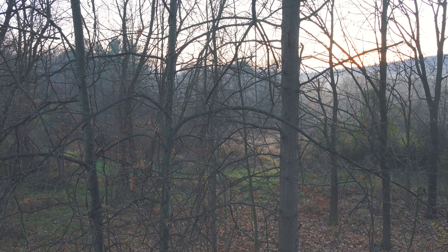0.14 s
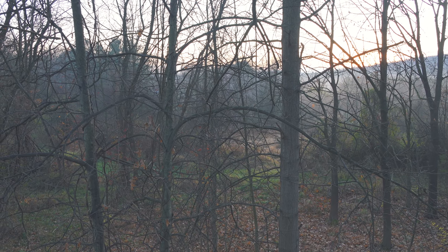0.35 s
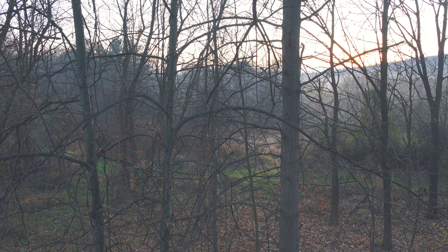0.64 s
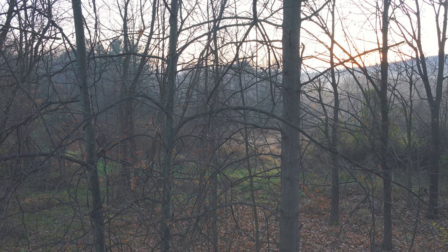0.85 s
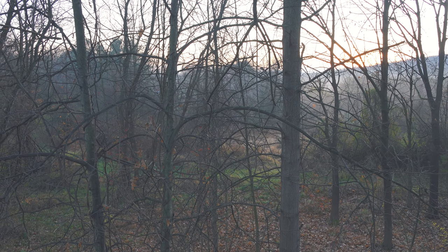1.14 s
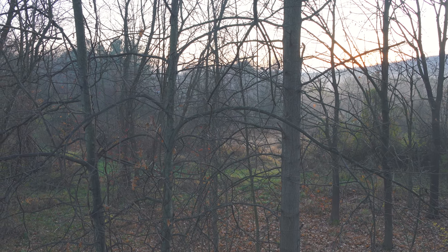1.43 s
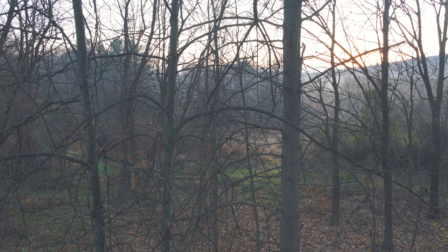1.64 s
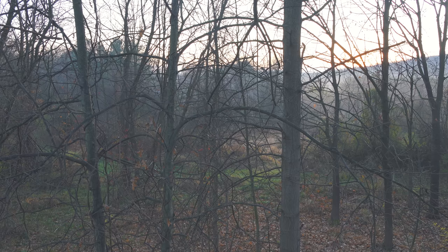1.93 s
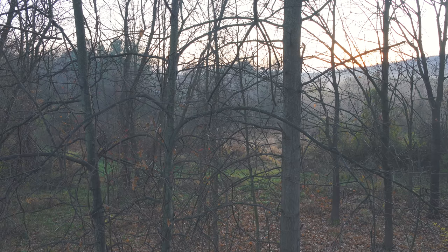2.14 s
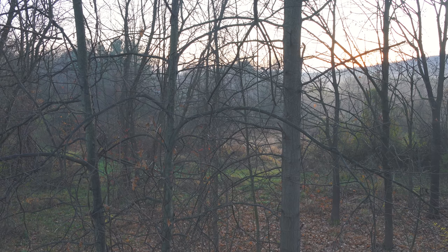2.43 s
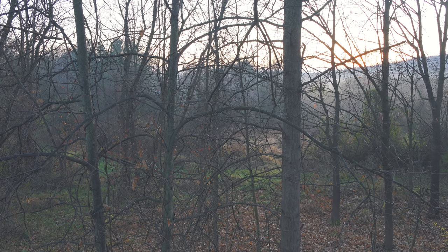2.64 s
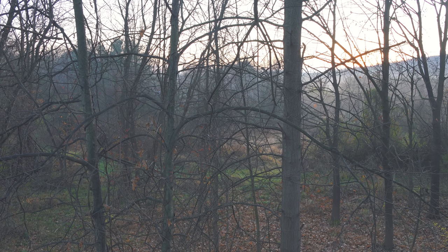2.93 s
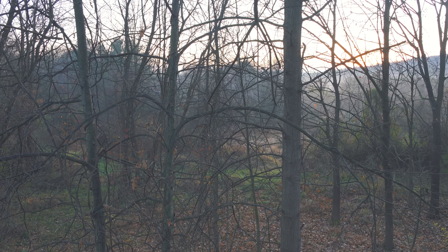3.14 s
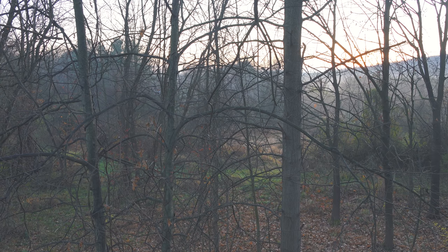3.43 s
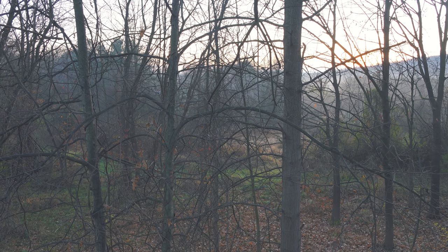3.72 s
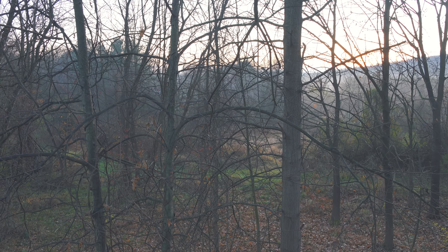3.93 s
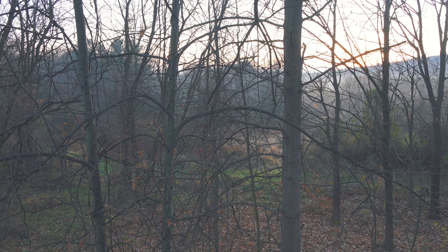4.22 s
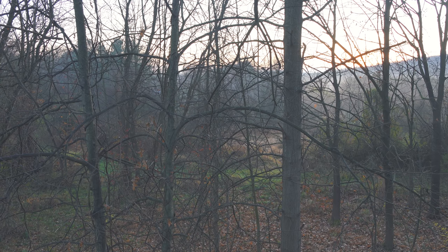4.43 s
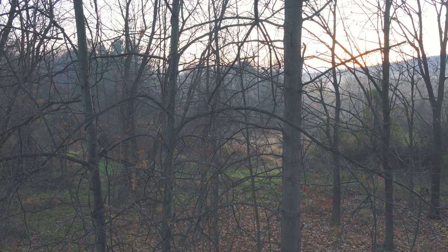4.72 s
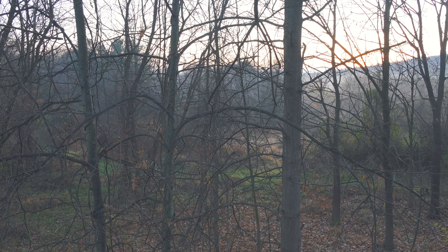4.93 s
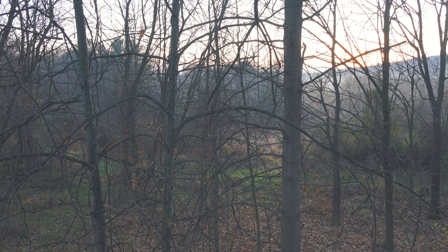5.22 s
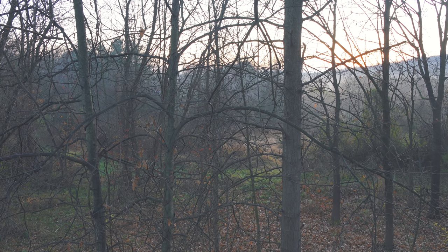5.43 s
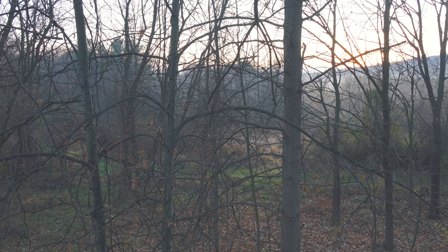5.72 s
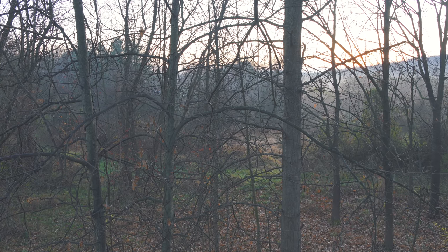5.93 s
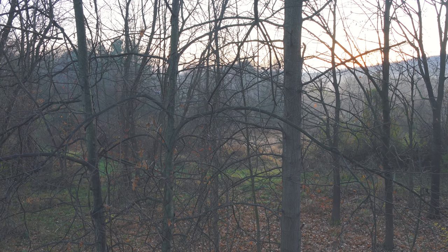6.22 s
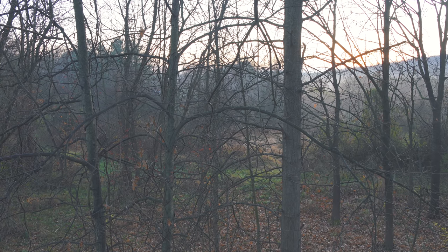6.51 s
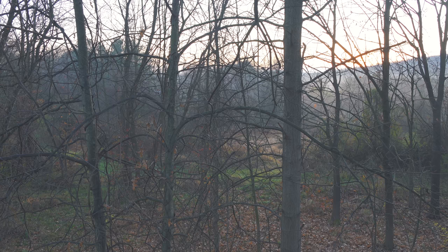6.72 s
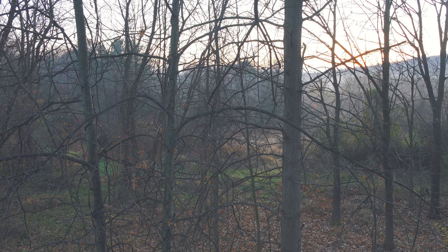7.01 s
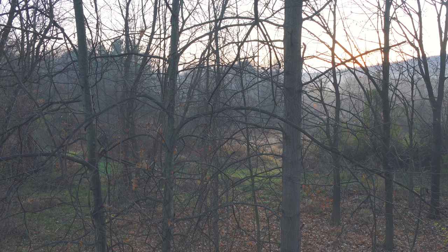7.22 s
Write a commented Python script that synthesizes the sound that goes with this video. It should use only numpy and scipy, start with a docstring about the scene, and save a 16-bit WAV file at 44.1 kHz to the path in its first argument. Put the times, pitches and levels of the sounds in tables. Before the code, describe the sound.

In a bare wood at dawn, a close crow's caw is just ending as a far crow calls in an even series. Small birds chip, lisp and tick faintly. Harsher caws crowd in later, with soft nasal mews and far answers, and one nearer hoarse screech cuts through. Trunks smear every call with echo; soft hush and low air rumble lie beneath.

```python
"""Bare woodland at dawn: a far hush and the low rumble of slowly moving air, both shaped noise, last throughout.
A close crow is already cawing; a far one calls in an even series, amid arched chips, thin lisps and rising ticks.
Harsher caws follow, then a soft low bump of noise, nasal mews and scattered answers from other far crows.
Late on, a nearer animal gives one hoarse screech, a wavering tone inside a rasp of noise.
Voices are sums of harmonics bent in pitch and filtered by a throat; echoes from the trunks smear them."""
import sys
import numpy as np
from scipy import signal
from scipy.fft import rfft, irfft, next_fast_len
from scipy.io import wavfile
from scipy.ndimage import map_coordinates

SR = 44100
rng = np.random.default_rng(int(sys.argv[2]) if len(sys.argv) > 2 else 0)


def log_audio(samples):
    """Write samples as a 16-bit WAV file to the path given in sys.argv[1]."""
    # one column per channel
    frames = np.atleast_2d(samples).T
    # limit to full scale, then quantise
    limited = np.clip(frames, -1, 1)
    pcm = np.round(limited * 32767).astype(np.int16)
    wavfile.write(sys.argv[1], SR, pcm)


N = 325017  # length in samples

# Harsh caws, all of one length. Each row: start in seconds, top pitch in Hz, level at the crest in dB.
CAWS = [(1.01, 614, -49.5), (2.16, 608, -49.5), (3.151, 652.5, -55), (3.925, 610.6, -42),
        (4.03, 614, -52.5), (4.27, 611, -42.5), (4.6, 611, -44.5), (4.981, 607.4, -43), (5.65, 618.6, -44),
        (6.05, 640, -44), (6.42, 628.4, -43.5), (6.88, 620.7, -43.5), (7.23, 624, -45.5)]
CAW_S = .175
# The closest crow. Each row: start in seconds, length in seconds, top pitch in Hz, level at the crest in dB.
CLOSE_CAW = [(-.125, .3, 630, -37.5)]
# A far crow calls evenly, always to the same top pitch; a single overtone of it carries.
SERIES_START_S, SERIES_STEP_S, SERIES_HZ = .145, .32, 1549
# Strength of each call in the series. Each entry: level at the crest in dB.
SERIES_DB = [-47, -47.5, -47, -46, -49.5, -44, -47.5, -44.5, -45]
# Answers from other far crows. Each row: start in seconds, top of the overtone in Hz, level at the crest in dB.
ANSWERS = [(2.91, 1378, -51), (3.169, 1333, -49), (3.53, 1826, -46.5), (3.64, 1716, -46.5),
           (3.76, 1672, -46), (4.08, 1485, -44), (4.88, 1500, -49.5), (5.84, 1086, -49.5),
           (5.909, 1525, -50.5), (6.579, 1550, -50), (7.081, 1392, -42.5)]
FAR_CALL_S = .135

# What each throat and the distance let through. Each row: frequency in Hz, relative gain in dB.
CAW_THROAT = [(500, -26), (1020, -26), (1240, 4.5), (1500, 5), (1850, -2), (2050, -12.5), (2600, -24.5),
              (3700, -21), (4600, -36), (8000, -60)]
CLOSE_THROAT = [(500, -20), (950, -26), (1200, -0.5), (1700, 0), (2050, -12), (2500, -27), (3400, -20),
                (4600, -32), (5700, -22.5), (8000, -39)]
FAR_THROAT = [(500, -26), (1100, -3), (1900, -13), (3000, -28.5)]
MEW_THROAT = [(900, -11), (1800, -2), (2450, -5), (2700, -4), (3400, 6.5), (3650, 12), (4400, -39),
              (4750, -15), (5300, -9.5)]
CHIP_THROAT = [(2100, -2.5), (2600, -18), (3100, 4), (4550, -2.5), (4900, -6), (5600, -5), (6300, -11),
               (7200, -26)]
OPEN_BEAK = [(3000, -25), (6000, 1)]

# Nasal mews, all to one top pitch. Each row: start in seconds, level at the crest in dB.
MEWS = [(2.459, -56), (3.199, -59), (5.63, -56.5), (6.34, -58.5)]
MEW_S, MEW_HZ = .36, 893.3
# Short chips, higher the harder they are given. Each row: start in seconds, level at the crest in dB.
CHIPS = [(.165, -52), (0.853, -51.5), (1.364, -45), (2.2, -46.5), (2.82, -45.5), (3.064, -55.5),
         (3.598, -57), (4.068, -49.5), (4.514, -50), (5.143, -45.5), (5.872, -47), (6.2, -58),
         (6.474, -46.5), (6.883, -55.5), (7.137, -54)]
CHIP_S, CHIP_HZ, CHIP_HZ_PER_DB = .046, 2084, 22  # length, top pitch at the mean level, rise with effort
# Thin high lisps. Each row: start in seconds, lowest pitch in Hz, level after the swell in dB.
LISPS = [(.243, 7330, -50.5), (1.382, 7540, -61.5), (3.175, 7260, -54), (4.921, 7530, -44)]
LISP_S = .122
# Faint rising ticks. Each row: start in seconds, top pitch in Hz, level halfway in dB.
TICKS = [(.663, 7000, -59), (1.525, 7100, -62), (1.928, 7070, -60), (2.595, 7400, -59.5), (3.24, 7140, -64),
         (4.02, 6730, -61.5), (4.44, 6950, -63), (6.68, 6330, -58.5)]
TICK_S = .031

# The hoarse cry: top pitch and level at the crest of its tone.
SCREECH_START_S, SCREECH_S, SCREECH_HZ, SCREECH_DB = 5.178, .285, 1136, -34
# Until the voice breaks upward it is lower (fraction of pitch), weaker and more ragged (fraction of pitch).
BREAK_S, BREAK_FLAT, BREAK_DB, BREAK_JITTER = .08, .066, -4.5, .037
RASP_DB, RASP_ATTACK_S, RASP_HOLD_S, RASP_FADE_DB_PER_S = -39.5, .04, .23, 66

# Shapes of the noises. Each row: frequency in Hz, relative spectrum level in dB.
RASP = [(450, -12), (670, 15), (1400, 17), (2200, 4.5), (2500, 5), (3000, 5), (4000, -1), (6000, -2.5),
        (8000, -15), (12000, -36)]
HUSH = [(20, 3), (45, -19), (90, -19), (150, -20), (350, -25.5), (950, -27.5), (1500, -26), (2400, -40.5),
        (3600, -47.5), (5000, -50), (9000, -54), (16000, -58)]
RUMBLE = [(3, -12), (9, 8), (16, -1.5), (28, -34), (120, -69)]
BUMP = [(20, -17), (45, 7), (80, -14), (160, -3), (300, -42), (1000, -90)]
BUMP_AT_S, BUMP_WIDTH_S, BUMP_DB = 2.14, .073, -45  # the level is the peak of the swell
# Slow air at the microphone. Each row: time in seconds, level in dB.
DRAUGHT = [(0, -33), (1.7, -41), (2.15, -31.5), (3.6, -38), (7.3, -33.5)]
# Reverberation of the wood. Each row: frequency in Hz, time to decay by 60 dB in seconds.
WOOD = [(300, 0.25), (1500, 2.27), (4000, 1.33), (8000, 0.3)]
TOP_HZ = 15750  # band limit


def amp(db):
    """Level law: decibels to amplitude gain."""
    return 10 ** (np.asarray(db) / 20)


def unit(x):
    """Normalisation: equal mean power, rms 1."""
    return x / np.sqrt(np.mean(x ** 2) + 1e-20)


def along(points, hz):
    """Logarithmic frequency scale: (Hz, value) points joined by straight lines on it."""
    f, v = np.transpose(points)
    return np.interp(np.log(hz + 1), np.log(f + 1), v)


def wobble(rate, size):
    """Random modulation: a smooth curve through rate random knots a second."""
    knots = rng.standard_normal(4096)
    return map_coordinates(knots, [np.arange(size) * rate / SR], mode="wrap")


def coloured(x, spectrum):
    """Linear filtering: each frequency of x is weighted by a smooth (Hz, dB) curve."""
    m = next_fast_len(len(x) + 8192)
    gain = amp(along(spectrum, np.fft.rfftfreq(m, 1 / SR)))
    return irfft(rfft(x, m) * gain, m)[:len(x)]


def arch(rise, crest, fall, droop, start_db, end_db):
    """Arched gesture over progress u (0-1): pitch climbs to a crest and sinks; level moves with it."""
    def gesture(u):
        climbing = np.clip(1 - u / crest, 0, 1) ** 2
        sinking = np.clip((u - crest) / max(1 - crest, 1e-3), 0, 1) ** droop
        return 1 - rise * climbing - fall * sinking, start_db * climbing + end_db * sinking
    return gesture


def scoop(drop, turn, flick, start_db, count):
    """Scooped gesture: swells as it slides to its lowest note, then rises with count upward flicks."""
    def gesture(u):
        sliding = np.clip(1 - u / turn, 0, 1)
        late = np.clip((u - turn) / max(1 - turn, 1e-3), 0, 1)
        flicks = np.sin(np.pi * (count - .5) * late) ** 4
        return 1 + drop * sliding ** 3 + flick * (late / 2 + flicks), start_db * sliding
    return gesture


def sweep(rise, edge_db):
    """Linear glide: pitch slides straight up to its top note; both ends differ from the middle by edge_db."""
    return lambda u: (1 - rise * (1 - u), edge_db * (2 * u - 1) ** 2)


def calls(rows, gesture, throat, rough, jitter, flutter_hz, count):
    """Source and filter: a syrinx's unevenly fluttering harmonics slide through the throat's resonances."""
    out = np.zeros(N + 2 * SR)  # one second of margin at each end
    for s, length, note_hz, db in rows:
        size = int(length * SR)
        bend, effort_db = gesture(np.arange(size) / size)
        pitch = note_hz * bend * (1 + jitter * wobble(flutter_hz, size))
        phase = 2 * np.pi * np.cumsum(pitch) / SR
        buzz = sum(np.cos(k * phase) for k in range(1, count + 1))
        frayed = buzz * np.exp(rough * wobble(flutter_hz, size))
        voice = coloured(frayed, throat)
        swell = amp(db + effort_db) * signal.windows.tukey(size, .1)
        out[SR + round(s * SR):][:size] += unit(voice) * swell
    return out[SR // 2:SR + N]  # starts half a second early, so that echoes are already under way


def woods(x, echo_db, scatter_db, scatter_t60):
    """Reverberation: near trunks scatter sound at once; the whole wood adds a frequency-dependent tail."""
    hz, t, z = signal.stft(rng.standard_normal((2, SR)), SR, nperseg=256)
    tail_decay = amp(-60 * t / along(WOOD, hz)[:, None])
    tail = signal.istft(z[0] * tail_decay, SR, nperseg=256)[1]
    near = signal.istft(z[1] * amp(-60 * t / scatter_t60), SR, nperseg=256)[1]
    response = amp(echo_db) * tail / np.linalg.norm(tail)
    response = response + amp(scatter_db) * near / np.linalg.norm(near)
    response[0] += 1  # direct sound
    return signal.fftconvolve(x, response / np.linalg.norm(response))[:len(x)][-N:]


def crows():
    """Harmonic voices at three distances: the farthest crows are heard by a single overtone."""
    caw = arch(rise=.14, crest=.27, fall=.27, droop=1.35, start_db=-1, end_db=-4.5)
    far_caw = arch(rise=.0689, crest=.352, fall=.1708, droop=1.527, start_db=-6.5, end_db=-11)
    caws = [(s, CAW_S, hz, db) for s, hz, db in CAWS]
    series = [(SERIES_START_S + k * SERIES_STEP_S, FAR_CALL_S, SERIES_HZ, db)
              for k, db in enumerate(SERIES_DB)]
    answers = [(s, FAR_CALL_S, hz, db) for s, hz, db in ANSWERS]
    near = calls(CLOSE_CAW, caw, CLOSE_THROAT, rough=.56, jitter=.035, flutter_hz=400.7, count=13)
    middle = calls(caws, caw, CAW_THROAT, rough=.5, jitter=.03, flutter_hz=350, count=8)
    far = calls(series + answers, far_caw, FAR_THROAT, rough=.35, jitter=.024, flutter_hz=300, count=1)
    return (woods(near, echo_db=-4, scatter_db=.5, scatter_t60=.23)
            + woods(middle, echo_db=0, scatter_db=.5, scatter_t60=.17)
            + woods(far, echo_db=-4, scatter_db=1, scatter_t60=.17))


def screech(jitter=.0219, shimmer_db=5.5, overtone_db=-16, grain_db=1.6):
    """Irregular vibration: a wavering arched tone and its octave inside broad turbulent noise."""
    t = np.arange(N) / SR - SCREECH_START_S
    cry_arch = arch(rise=.1, crest=.46, fall=.21, droop=1.25, start_db=-4, end_db=-8)
    bend, effort_db = cry_arch(t / SCREECH_S)
    straining = np.clip((BREAK_S - t) / .0098, 0, 1)  # 1 before the voice breaks, 0 after
    waver = 1 + (jitter + BREAK_JITTER * straining) * wobble(300, N)
    pitch = SCREECH_HZ * bend * (1 - BREAK_FLAT * straining) * waver
    phase = 2 * np.pi * np.cumsum(pitch) / SR
    # the vibration keeps catching, which breaks the tone into rough bursts
    catching = amp(shimmer_db * np.minimum(wobble(220, N), 1))
    tone = unit((np.sin(phase) + amp(overtone_db) * np.sin(2 * phase)) * catching)
    grain = amp(grain_db * wobble(150, N))
    rasp = unit(coloured(rng.standard_normal(N), RASP) * grain)
    voiced = np.clip(np.minimum(t, SCREECH_S - t) / .0057, 0, 1)
    fading = amp(-RASP_FADE_DB_PER_S * np.maximum(t - RASP_HOLD_S, 0))
    rasping = np.clip(t / RASP_ATTACK_S, 0, 1) * fading
    tone_level = amp(SCREECH_DB + effort_db + BREAK_DB * straining)
    cry = voiced * tone_level * tone + rasping * amp(RASP_DB) * rasp
    return woods(cry, echo_db=-14, scatter_db=-10, scatter_t60=.15)


def chips():
    """Pitch rises with effort: short arched chips of three harmonics."""
    gesture = arch(rise=.342, crest=.353, fall=.29, droop=1.1, start_db=-6.5, end_db=-9.5)
    usual_db = np.mean([db for s, db in CHIPS])
    rows = [(s, CHIP_S, CHIP_HZ + CHIP_HZ_PER_DB * (db - usual_db), db) for s, db in CHIPS]
    voice = calls(rows, gesture, CHIP_THROAT, rough=.4, jitter=.012, flutter_hz=420, count=3)
    return woods(voice, echo_db=-6, scatter_db=0, scatter_t60=.15)


def mews():
    """Resonant filtering: six nearly steady harmonics take a nasal colour from the throat."""
    gesture = arch(rise=.1, crest=.167, fall=.115, droop=1.4, start_db=1, end_db=6)
    rows = [(s, MEW_S, MEW_HZ, db) for s, db in MEWS]
    voice = calls(rows, gesture, MEW_THROAT, rough=.12, jitter=.002, flutter_hz=70, count=6)
    return woods(voice, echo_db=-8, scatter_db=-12, scatter_t60=.15)


def lisps():
    """Frequency modulation: a single thin high tone slides down, then flicks upward twice."""
    gesture = scoop(drop=.16, turn=.56, flick=.14, start_db=-3.5, count=2)
    rows = [(s, LISP_S, hz, db) for s, hz, db in LISPS]
    voice = calls(rows, gesture, OPEN_BEAK, rough=.37, jitter=.011, flutter_hz=596, count=1)
    return woods(voice, echo_db=7.5, scatter_db=-7, scatter_t60=.26)


def ticks():
    """Rapid glide: a single faint tone rises so briefly that it is heard as a tick."""
    gesture = sweep(rise=.22, edge_db=1)
    rows = [(s, TICK_S, hz, db) for s, hz, db in TICKS]
    voice = calls(rows, gesture, OPEN_BEAK, rough=.13, jitter=.049, flutter_hz=463, count=1)
    return woods(voice, echo_db=-1, scatter_db=2, scatter_t60=.84)


def bump():
    """Amplitude envelope: a Gaussian swell of bass noise, brief and soft."""
    t = np.arange(N) / SR - BUMP_AT_S
    low = unit(coloured(rng.standard_normal(N), BUMP))
    return amp(BUMP_DB) * np.exp(-(t / BUMP_WIDTH_S) ** 2) * low


def rumble():
    """Air pressure fluctuation: very low noise heaves slowly at the microphone."""
    heaving = unit(coloured(rng.standard_normal(N), RUMBLE))
    draught_db = np.interp(np.arange(N) / SR, *np.transpose(DRAUGHT))
    return amp(draught_db) * heaving


def hush(level_db=-43):
    """Broadband noise: the far hush of the valley, its level wavering very slightly."""
    noise = unit(coloured(rng.standard_normal(N), [(5.2, -60), *HUSH]))
    return amp(level_db) * noise * amp(.17 * wobble(3.83, N))


def scene():
    """Superposition: all sources add at one microphone."""
    small_birds = chips() + mews() + lisps() + ticks()
    return (crows() + screech() + small_birds + bump() + rumble() + hush())[None]


def record(dry):
    """Band limiting: nothing passes at or above the top frequency."""
    m = next_fast_len(N + 8192)
    passed = np.fft.rfftfreq(m, 1 / SR) < TOP_HZ
    return irfft(rfft(dry, m) * passed, m)[..., :N]


dry = scene()
out = record(dry)
log_audio(out)
```